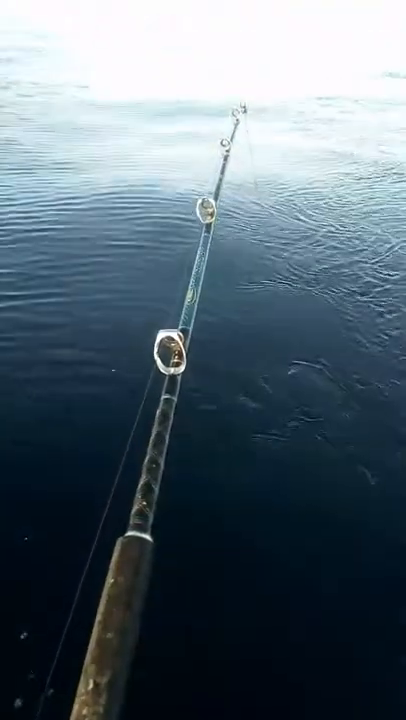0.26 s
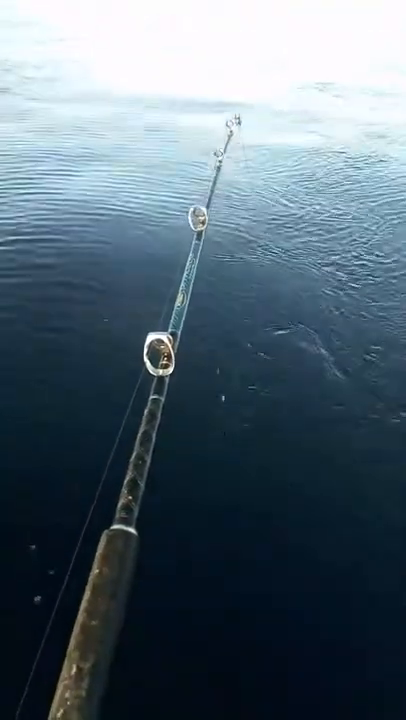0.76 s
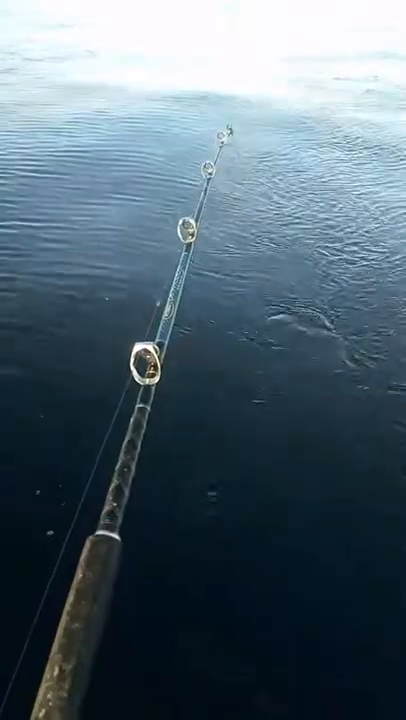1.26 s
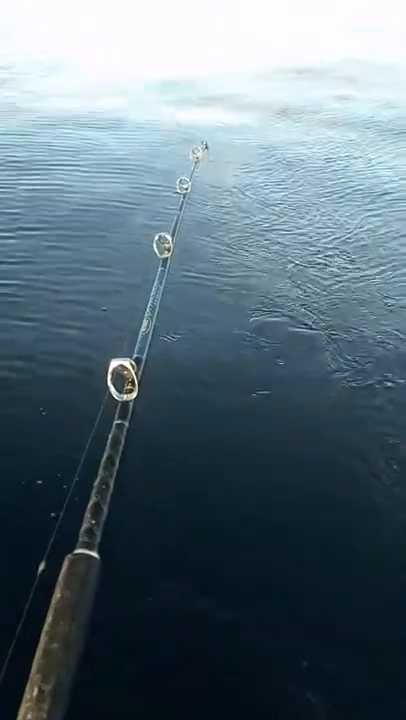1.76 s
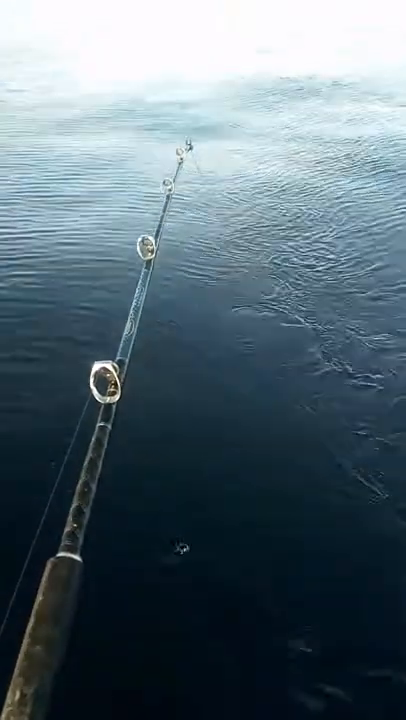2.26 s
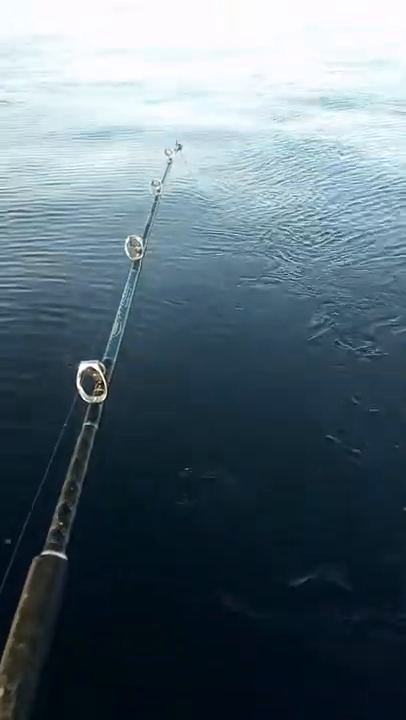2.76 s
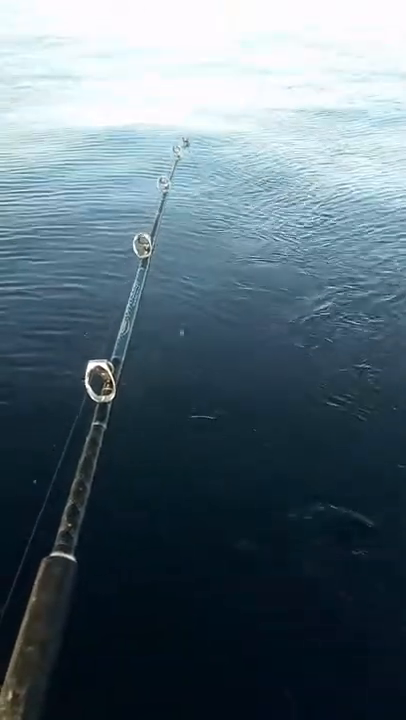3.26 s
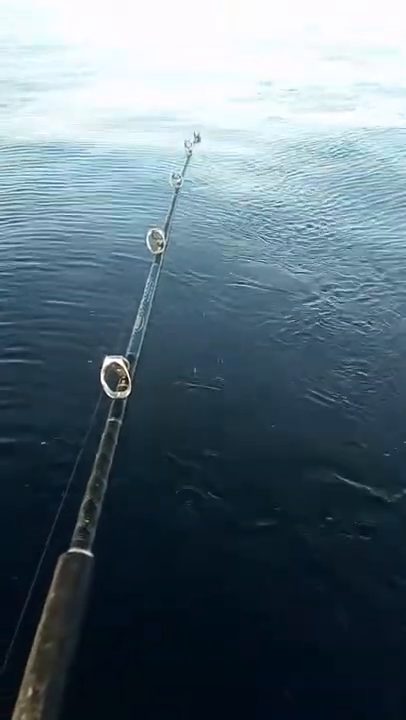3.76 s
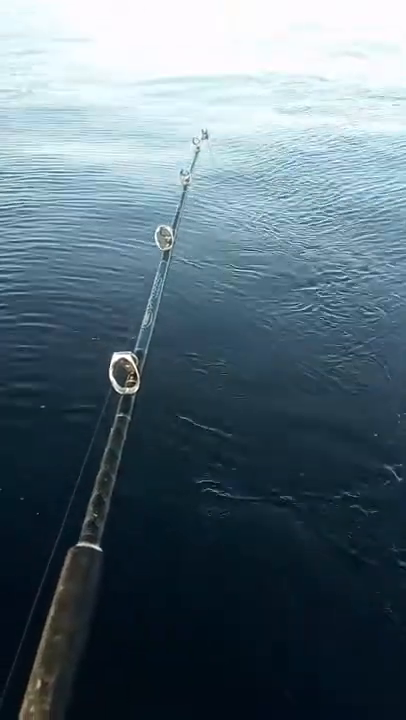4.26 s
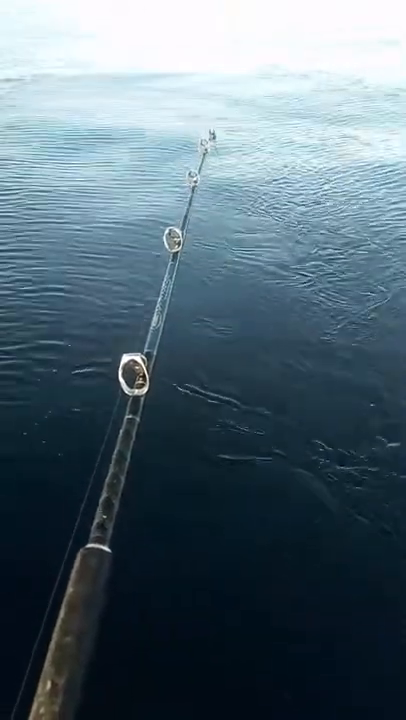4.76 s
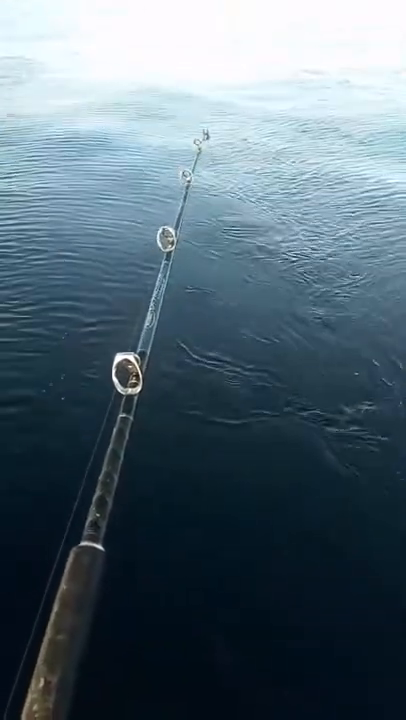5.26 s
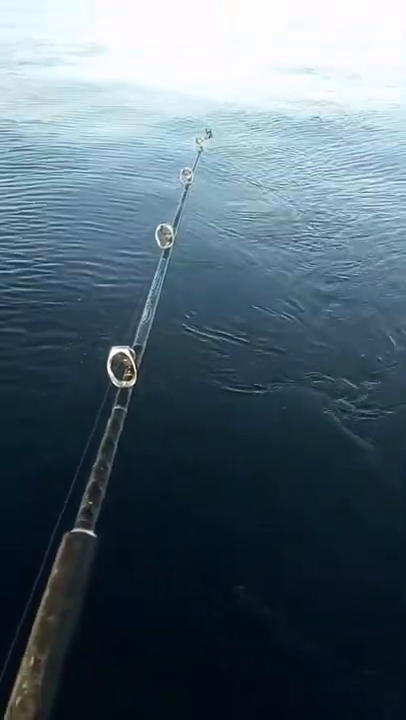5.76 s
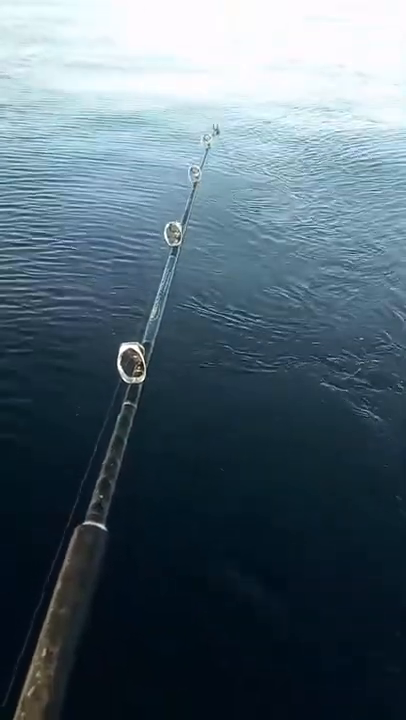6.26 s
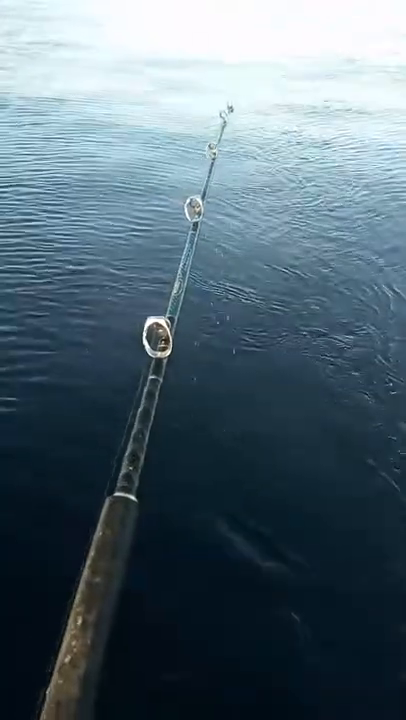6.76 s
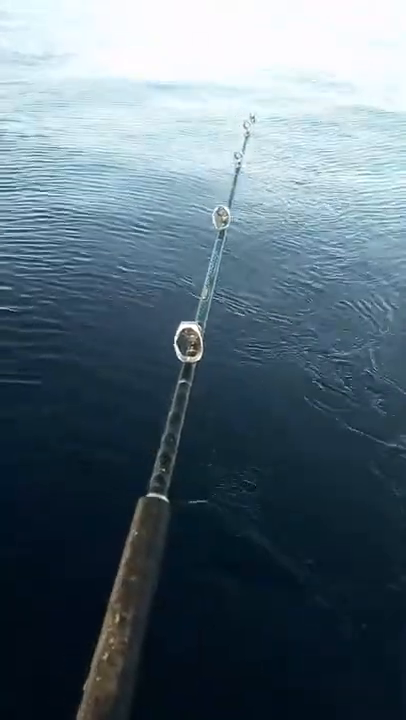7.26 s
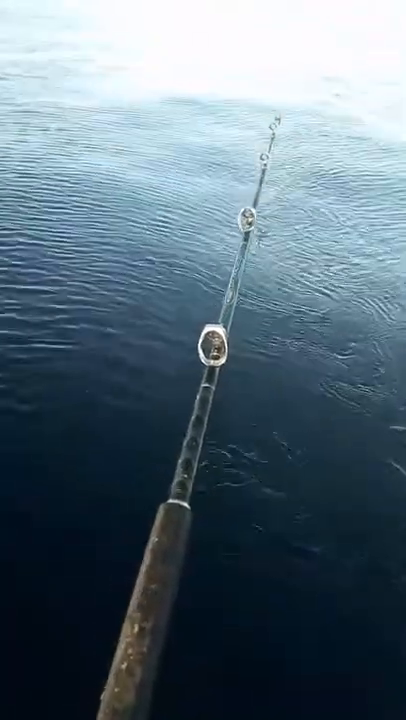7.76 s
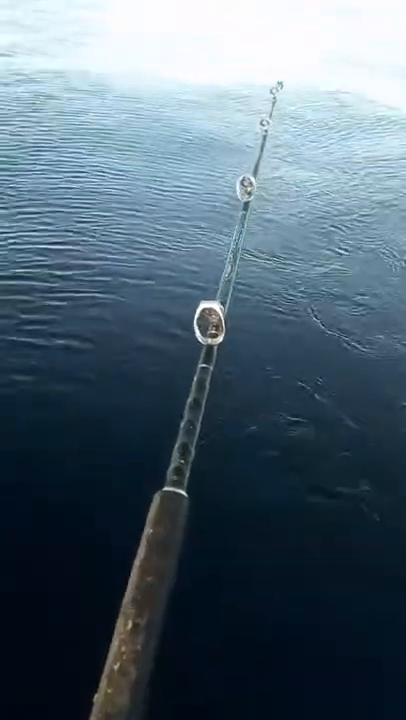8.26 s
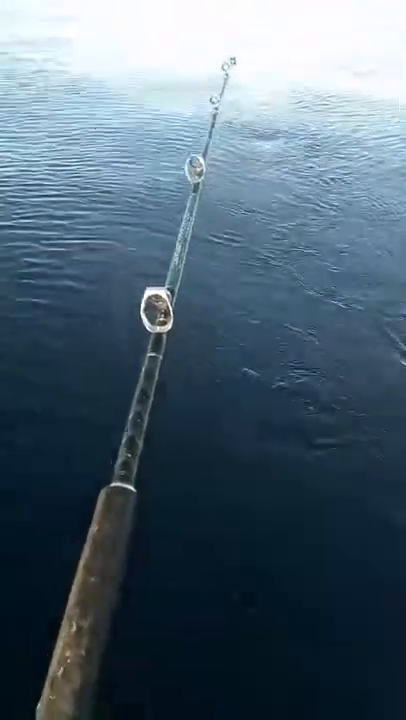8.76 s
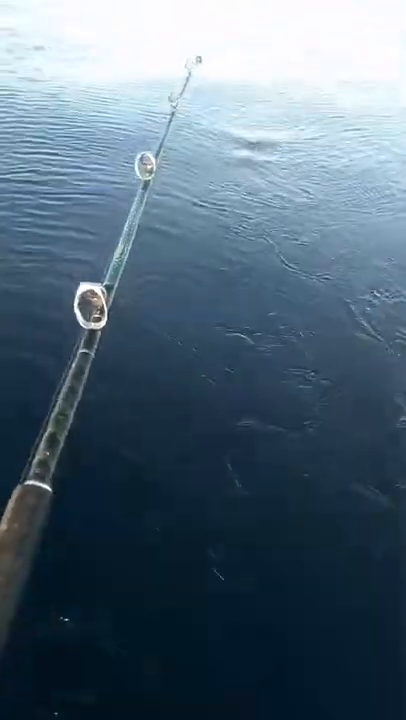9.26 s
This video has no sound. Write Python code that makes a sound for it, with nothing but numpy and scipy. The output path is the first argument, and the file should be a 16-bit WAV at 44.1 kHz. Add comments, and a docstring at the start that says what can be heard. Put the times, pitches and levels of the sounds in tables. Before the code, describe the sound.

A small electric fishing reel whines steadily up close, throbbing several times a second with raspy gears, then its pitch slides down as it slows.

```python
"""Electric fishing reel

An electric fishing reel winds line up from deep water, close to the microphone on a boat, and slows near the end.
Tones locked to the motor make its hum, the whine of its ten-tooth pinion and the song of a second gear stage.
Filtered noise and shaft lines make the gears rasp in the housing; every spool turn swishes and loads the motor.
Bursts of low noise are wind on the microphone ports; short damped noises are knocks on the boat and rod.
"""
import sys
import numpy as np
from scipy import signal
from scipy.fft import rfft, irfft, next_fast_len
from scipy.io import wavfile

SR = 44100
rng = np.random.default_rng(int(sys.argv[2]) if len(sys.argv) > 2 else 0)


def pcm_store(signal):
    """Save signal as 16-bit PCM."""
    levels = np.round(np.clip(np.atleast_2d(signal), -1, 1) * 32767)
    wavfile.write(sys.argv[1], SR, levels.astype(np.int16).T)


N = 419832
TIME = np.arange(N) / SR
SIZE = next_fast_len(N + 4096, True)
BINS_HZ = np.maximum(np.arange(SIZE // 2 + 1) * SR / SIZE, 1)
CRUISE_SPEED = 150  # motor turns per second


def from_db(db):
    """Decibels to gain."""
    return 10 ** (np.asarray(db) / 20)


def rms_one(x):
    """Scale to unit power."""
    return x / np.sqrt(np.mean(x ** 2) + 1e-20)


def in_time(rows):
    """Each column of a curve at every sample."""
    s, *columns = np.transpose(rows)
    return [np.interp(TIME, s, c) for c in columns]


def in_hz(rows):
    """Each column of a spectrum at every frequency bin, joined along log frequency."""
    hz, *columns = np.transpose(rows)
    return [np.interp(np.log(BINS_HZ), np.log(hz), c) for c in columns]


def colour(x, gain):
    """Filter by a gain per frequency bin."""
    return irfft(rfft(x, SIZE) * gain, SIZE)[..., :N]


def white():
    """White noise of 0 dB per Hz."""
    return rng.standard_normal(N) * np.sqrt(SR / 2)


def white_pair():
    """Two independent white noises."""
    return np.array([white(), white()])


def drift(rate):
    """Smooth random curve of spread 1 that changes about rate times a second."""
    step = 40  # samples between the points of the curve
    pole = np.exp(-2 * step * np.pi * rate / SR)
    raw = rng.standard_normal(N // step + 2002)
    slow = signal.lfilter([1], [1, -2 * pole, pole * pole], raw)[2000:]  # drop the filter's start
    return np.interp(np.arange(N) / step, np.arange(len(slow)), rms_one(slow))


def swell(turns, depth_db, peak_at):
    """A gain of unit power that peaks once a turn, at the given share of the turn."""
    return rms_one(from_db(depth_db * np.cos(2 * np.pi * (turns - peak_at))))


def burst(start, level_db, decay, rise):
    """Envelope that jumps up and dies away."""
    age = np.maximum(TIME - start, 0)
    attack = 1 - np.exp(-age / rise)
    return from_db(level_db) * attack * np.exp(-np.minimum(age / decay, 20))


GUST_RISE_SHARE = 0.74  # rise length against fall length


def gust(peak, length):
    """Envelope that swells quickly and ebbs more slowly."""
    age = (TIME - peak) / length
    age = np.where(age < 0, age / GUST_RISE_SHARE, age)
    return np.exp(-np.minimum(age ** 2, 20))


def response(points, hz):
    """Gain of a radiating body for a gliding tone."""
    points_hz, db = np.transpose(points)
    return from_db(np.interp(np.log(hz), np.log(points_hz), db))


def follow(law, speed, load_db):
    """Gain of a source that follows the load and a power of the speed."""
    level_db, per_load, power = law
    return from_db(level_db + per_load * load_db) * (speed / CRUISE_SPEED) ** power


def partial(turns, multiple, rough, rough_hz):
    """A line locked to the shaft; uneven tooth contact shakes its strength and phase."""
    angle = 2 * np.pi * multiple * turns
    in_step = (1 + rough * drift(rough_hz)) * np.cos(angle)
    out_of_step = rough * drift(rough_hz) * np.sin(angle)
    return rms_one(in_step + out_of_step)


# The reel as the two microphone ports pick it up.
# Each row: frequency in Hz, left over right in dB, lead of the left in radians, likeness of the ports from 0 to 1.
PORT_PICKUP = [(100, -0.5, 0.14, 1), (437, 0.5, 1.06, 0.86), (726, 3, 1.64, 1), (1660, 3, 2.44, 1),
               (2003, 4, 3.55, 0.93), (3240, 0, 5.25, 0.22), (3360, -5.5, 4.55, 0.88),
               (4450, 12, 4.6, 0.14), (4340, 8, 4.8, 0.42), (5020, 7.5, 3.59, 0.11), (7070, 6, 4.44, 0.99),
               (6830, 4.5, 5.48, 0.33), (9250, 0.5, 5.15, 0.25)]


def at_ports(direct, scattered, gain):
    """Direct sound reaches the left port first; scattered sound differs between the ports."""
    balance_db, lead, alike = in_hz(PORT_PICKUP)
    alike = np.clip(alike, 0, 1)
    spectrum = rfft(direct, SIZE)
    if scattered is not None:
        mid, side = rfft(scattered, SIZE)
        shared = np.sqrt((1 + alike) / 2) * mid
        opposed = np.sqrt((1 - alike) / 2) * side * [[1], [-1]]
        spectrum = spectrum + shared + opposed
    ratio = from_db(balance_db)
    ports = np.array([ratio, np.exp(-1j * lead)]) * np.sqrt(2 / (1 + ratio ** 2))
    return irfft(spectrum * ports * gain, SIZE)[:, :N]


def air():
    """Faint steady hiss, independent at each port."""
    return from_db(-104) * white_pair()  # dB per Hz


# Gusts and short buffets on the ports.
# Each row: peak in seconds, left level in dB, right level in dB, length in seconds.
WIND_GUSTS = [(0.532, -53, -62, 0.16), (1.953, -42, -66, 0.088), (2.062, -26, -48, 0.0065),
              (2.11, -33, -54, 0.023), (2.234, -54, -52, 0.016), (2.303, -40.5, -55, 0.077),
              (2.537, -63, -45, 0.02), (2.748, -53, -57, 0.08), (2.89, -67, -40, 0.025),
              (2.958, -65, -35, 0.019), (2.997, -73, -38.5, 0.024), (3.195, -68, -49, 0.04),
              (3.313, -68, -47, 0.04), (3.416, -48, -25.5, 0.011), (4.434, -58, -74, 0.062),
              (5.609, -65, -40, 0.018), (5.766, -62, -25.5, 0.012), (5.84, -59, -27, 0.042),
              (5.907, -56, -19.5, 0.016), (6.11, -59, -39.5, 0.085), (6.216, -66, -31.5, 0.038),
              (6.31, -28.5, -30, 0.03), (6.494, -48, -38, 0.068), (6.584, -59, -32, 0.04),
              (6.785, -41, -72, 0.025), (7.025, -45.5, -68, 0.18), (7.094, -36, -64, 0.014),
              (8.19, -63, -56, 0.15), (8.46, -58, -36, 0.05), (8.58, -67, -52.5, 0.27)]
# Colour of the buffeting. Each row: frequency in Hz, relative level in dB.
WIND_COLOUR = [(20, -20), (55, 8.5), (115, 10.5), (190, -0.5), (270, -13.5), (420, -21), (900, -42),
               (3000, -86)]
BREEZE_DB = -68


def wind(lumpy_db=-1.5):
    """Lumpy low buffeting over a faint breeze, each port with its own eddies."""
    strength = from_db(BREEZE_DB)
    for peak, left_db, right_db, length in WIND_GUSTS:
        strength = strength + from_db([[left_db], [right_db]]) * gust(peak, length)
    eddies = []
    for _ in range(2):
        lumps = rms_one(from_db(lumpy_db * drift(31)))
        rumble = rms_one(colour(white(), from_db(in_hz(WIND_COLOUR)[0])))
        eddies.append(lumps * rumble)
    return strength * np.array(eddies)


def thuds(events, spectrum, rise, apart):
    """Short, heavily damped blows, slightly different at the two ports."""
    blows = sum(burst(start, db, decay, rise) for start, db, decay in events)
    shake = white() + apart * white() * [[1], [-1]]
    return blows * rms_one(colour(shake, from_db(in_hz(spectrum)[0])))


# Knocks on the boat. Each row: start in seconds, level in dB, decay in seconds.
BOAT_KNOCKS = [(6.401, -18.5, 0.0083), (6.41, -25, 0.035), (6.467, -42, 0.043), (6.523, -38, 0.031),
               (6.59, -41, 0.022), (8.461, -40, 0.076)]
# Colour of a knock. Each row: frequency in Hz, relative level in dB.
KNOCK_COLOUR = [(70, -15), (200, 7.5), (330, 6.5), (600, 4.5), (1000, -6), (1800, -9.5), (2600, 2.5),
                (3600, -12), (4400, -4), (6000, -15), (12000, -32)]
# Soft bumps of the hand on the rod. Each row: start in seconds, level in dB, decay in seconds.
ROD_BUMPS = [(.11, -35, 0.057), (1.085, -30.5, 0.046), (1.17, -52, 0.036), (1.245, -36.5, 0.031)]
# Colour of a bump. Each row: frequency in Hz, relative level in dB.
BUMP_COLOUR = [(30, -26), (80, -4), (130, -3), (185, 4), (260, -5), (380, -18), (900, -64)]


def knocks():
    """Something clatters on the boat, and the hand bumps the rod: sharp and soft noise blows."""
    clatter = thuds(BOAT_KNOCKS, KNOCK_COLOUR, rise=0.0005, apart=0.65)
    return clatter + thuds(ROD_BUMPS, BUMP_COLOUR, rise=0.0025, apart=0.2)


GEAR_RATIO = 25.86  # motor turns per spool turn
WOBBLE_SPEED = 1.05  # motor turns per second, before the line steadies it
WOBBLE_STEADYING = 0.84  # dB per dB of load


def steadied(load_db):
    """Share of the spool's wobble that is left as the line grows taut."""
    return from_db(-WOBBLE_STEADYING * np.maximum(load_db, -4))


def shaft(speed, load_db, jitter_turns=0.0059, jitter_hz=14):
    """Turns of motor and spool; the spool's uneven load pulls on the motor once a turn."""
    wobble = WOBBLE_SPEED * steadied(load_db)
    spool = np.cumsum(speed) / SR / GEAR_RATIO
    motor = np.cumsum(speed + wobble * np.cos(2 * np.pi * (spool - .58))) / SR
    return motor + jitter_turns * drift(jitter_hz), spool


# How hard the line rubs on the spool. Each row: time in seconds, relative level in dB.
LINE_RUB = [(0, 4.5), (.6, 4), (1.92, -2.5), (3.21, 5.5), (4.2, 1), (5.17, 4.5), (6.1, 0.5), (7.53, 2),
            (7.9, -21), (9.52, -27)]
# Colour of the rubbing, with the spool's resonance. Each row: frequency in Hz, relative level in dB.
SWISH_COLOUR = [(300, -110), (480, -75), (620, -95), (700, -73), (755, -63.5), (830, -75), (920, -82),
                (1100, -100.5), (1600, -120)]
# Low lines that shake the spool. Each entry: multiple of the motor speed.
SHAKE_ORDERS = [6, 7]
# Strength of those lines. Each entry: level in dB before the swish colour.
SHAKE_DB = [18.5, 13]


def swish(motor, spool):
    """The spool rubs once a turn, and low motor lines ring out as they slide through its resonance."""
    rub = from_db(in_time(LINE_RUB)[0]) * swell(spool, depth_db=6.5, peak_at=0.069)
    shake = sum(from_db(db) * partial(motor, order, rough=1.0, rough_hz=30)
                for order, db in zip(SHAKE_ORDERS, SHAKE_DB))
    return at_ports(shake, rub * white_pair(), from_db(in_hz(SWISH_COLOUR)[0]))


def comb(motor, count=80, size=2048, spread_db=2.5):
    """Uneven teeth jolt alike on every turn: multiples of the speed, slowly blending two patterns."""
    jolts, blend = 0, drift(2.66)
    for share in (np.cos(blend), np.sin(blend)):
        phases = np.exp(2j * np.pi * rng.random(count))
        strengths = from_db(spread_db * rng.standard_normal(count)) * phases
        one_turn = rms_one(irfft(np.r_[0, strengths], size)) * np.sqrt(count)
        jolts = jolts + share * np.interp(motor % 1, np.arange(size) / size, one_turn)
    return jolts


RATTLE_HZ, RATTLE_WIDTH_HZ = 3234, 810
RATTLE_ORDER = 30  # multiple of the motor speed that drives the rattle
RATTLE_DB, RATTLE_CAPTURE_HZ = -36.5, 212  # level before the port balance
SING_DB, SING_HZ, SING_RANGE_HZ = -32, 3092, 100  # level before the port balance


def rattle(motor, speed, loose=0.81):
    """A rough buzz and a whistle in one housing resonance, as a mesh overtone sweeps through it."""
    band = 1 / (1 + (2 * (BINS_HZ - RATTLE_HZ) / RATTLE_WIDTH_HZ) ** 2) ** 2
    buzz = rms_one(colour(rms_one(comb(motor)), band))
    buzz = buzz + loose * rms_one(colour(white(), band))
    drive_hz = RATTLE_ORDER * speed
    caught = 1 / (1 + ((drive_hz - RATTLE_HZ) / RATTLE_CAPTURE_HZ) ** 8)
    # the whistle answers over a narrower range than the buzz
    tuned = 1 / (1 + ((drive_hz - SING_HZ) / SING_RANGE_HZ) ** 4)
    whistle = from_db(SING_DB) * tuned * partial(motor, RATTLE_ORDER, rough=0.52, rough_hz=35)
    return (from_db(RATTLE_DB) * caught * rms_one(buzz) + whistle) * from_db([[2], [-4]])


# Bursts of grinding teeth. Each row: peak in seconds, level in dB before the port gain, length in seconds.
GRINDS = [(7.044, -28.5, 0.062), (7.205, -28.5, 0.049), (7.36, -41, 0.03)]
CHATTER_HZ, CHATTER_WIDTH_HZ = 4300, 910


def chatter(motor):
    """Under the heaviest pull the teeth grind in short bursts, a buzz with a little noise in it."""
    band = 1 / (1 + (2 * (BINS_HZ - CHATTER_HZ) / CHATTER_WIDTH_HZ) ** 4)
    buzz = rms_one(colour(comb(motor), band))
    grind = rms_one(buzz + 0.71 * rms_one(colour(white(), band)))
    envelope = sum(from_db(db) * gust(peak, length) for peak, db, length in GRINDS)
    return at_ports(grind * envelope, None, 0.94)


# Shaft lines that sing out during the run-down. Each entry: multiple of the motor speed.
RUN_DOWN_ORDERS = [16.8, 16.8, 26, 33, 33, 33, 40, 43, 50, 60]
# The resonance each one passes. Each row: resonance in Hz, reach in Hz, level in dB before the port gain.
RUN_DOWN_RESONANCES = [(2440, 40, -34.5), (2184, 35, -37), (3690, 120, -36), (4600, 140, -40.5),
                       (4240, 92, -42), (3450, 99, -50), (5320, 81, -40), (5130, 78, -34), (5850, 150, -39),
                       (6450, 190, -42.5)]


def run_down(motor, speed):
    """As the motor slows, weak shaft lines slide through narrow resonances and sing out."""
    tones = 0
    for order, (hz, reach_hz, db) in zip(RUN_DOWN_ORDERS, RUN_DOWN_RESONANCES):
        tuned = np.exp(-np.minimum(((order * speed - hz) / reach_hz) ** 2, 20))
        tones = tones + from_db(db) * tuned * partial(motor, order, rough=0.41, rough_hz=29)
    return at_ports(tones, None, 0.85)


# Lines from uneven teeth. Each entry: multiple of the motor speed.
TOOTH_ORDERS = [6, 9, 11, 14, 16.3, 16.8, 18, 21, 22, 24, 33, 34, 42, 43, 44, 46, 47, 48]
# Strength of those lines. Each entry: level in dB over one Hz of rasp.
TOOTH_DB = [19.5, 26, 21.5, -4, 17.5, 24.5, 25, -2, 17, 20, 23.5, 26.5, 18, 15.5, 17, 14.5, 15, 9]
# High whistling shaft lines. Each entry: multiple of the motor speed.
HIGH_ORDERS = [58, 60, 70, 80]
# Strength of the whistles. Each entry: relative level in dB.
HIGH_DB = [26, 30.3, 32.6, 34.7]
# How well the whistles carry at each pitch. Each row: frequency in Hz, gain in dB.
HIGH_CARRY = [(6100, -25), (6500, -3), (6900, 5.5), (7300, -0.5), (7800, -2)]
# Ride of whistles and jolts through the take-up. Each row: time in seconds, relative level in dB.
HIGH_RIDE = [(0, 6), (1.2, -2), (7.4, -8), (7.8, -11), (8.4, 3), (8.9, -1.5), (9.3, 2.5), (9.52, -0.5)]
COMB_DB, COMB_LOWEST_HZ = 16, 1980  # jolts against the whistles, and where their low end rolls off


def shaft_lines(motor, speed, top_hz=7900):
    """The weaker lines locked to the shaft; the housing passes little of them above its top resonance."""
    lines = sum(from_db(db) * partial(motor, order, rough=1.0, rough_hz=24.0)
                for order, db in zip(TOOTH_ORDERS, TOOTH_DB))
    whistles = 0
    for order, db in zip(HIGH_ORDERS, HIGH_DB):
        carried = from_db(db) * response(HIGH_CARRY, order * speed)
        whistles = whistles + carried * partial(motor, order, rough=0.23, rough_hz=25)
    jolts = colour(comb(motor), 1 / (1 + (COMB_LOWEST_HZ / BINS_HZ) ** 2))
    lines += from_db(in_time(HIGH_RIDE)[0]) * (whistles + from_db(COMB_DB) * jolts)
    return colour(lines, 1 / (1 + (BINS_HZ / top_hz) ** 20))


# Colour the housing gives the rasp. Each row: frequency in Hz, relative level in dB.
HOUSING_COLOUR = [(100, -94.5), (330, -85), (600, -80.5), (1200, -80.5), (1800, -78.5), (2200, -74.5),
                  (2450, -74), (2700, -79), (2900, -72), (3300, -73), (3900, -77.5), (4400, -73),
                  (5250, -74), (5550, -69.5), (5800, -72.5), (6500, -67), (6900, -67), (7350, -71),
                  (7600, -73), (8100, -86), (8600, -94.5), (10300, -91.5), (13500, -102), (15300, -96)]
# Housing resonances on top of it. Each row: centre in Hz, width in Hz, boost in dB.
HOUSING_RESONANCES = [(523, 97, 12.5), (1607, 250, 5), (3120, 220, 4), (3603, 440, 7), (4760, 270, -2),
                      (5024, 215, 6)]
# Ride of the gear rasp. Each row: time in seconds, relative level in dB.
RASP_RIDE = [(0, -1), (.3, 2), (1.0, -1), (1.3, -2.5), (4.5, 0), (6.5, -0.5), (7.05, 2), (7.6, 6), (7.8, 0),
             (8.5, -1), (8.95, -2.5), (9.52, -8)]
# Ride of the bearing hiss. Each row: time in seconds, relative level in dB.
HISS_RIDE = [(0, 2.5), (.25, 3), (.75, 3), (1.2, 1.5), (5.2, 2), (6.8, 1.5), (7.53, 1.5), (7.85, 1.5),
             (8.35, -2.5), (9, 2.5), (9.52, -8.5)]
SLIDING_POWER = 0.42  # power of the speed: tooth noise fades faster than the lines as the motor slows


def rasp(motor, spool, speed, low_hz=2200, split_hz=4800):
    """Sliding teeth and bearings shake the housing with noise and shaft lines."""
    contact = swell(motor, depth_db=1.0, peak_at=0.12) * rms_one(from_db(2.03 * drift(23)))
    contact = contact * (speed / CRUISE_SPEED) ** SLIDING_POWER
    housing_db = in_hz(HOUSING_COLOUR)[0]
    for hz, width, db in HOUSING_RESONANCES:
        housing_db = housing_db + db / (1 + (2 * (BINS_HZ - hz) / width) ** 2)
    sound = at_ports(shaft_lines(motor, speed), contact * white_pair(), from_db(housing_db))
    # the gears fill the middle of the range, the bearings the top
    above_low, above_split = (1 / (1 + (hz / BINS_HZ) ** 10) for hz in (low_hz, split_hz))
    gears = colour(sound, above_low - above_split)
    bearings = colour(sound, above_split)
    body = (sound - gears - bearings) * speed / speed.max()
    hiss = from_db(in_time(HISS_RIDE)[0]) * bearings * swell(spool, depth_db=1.12, peak_at=0.95)
    return body + from_db(in_time(RASP_RIDE)[0]) * gears + hiss


# How well the motor casing radiates the hum at each pitch. Each row: frequency in Hz, gain in dB.
CASING_GAIN = [(256, -30), (282, 0), (335, -2), (378, -5), (408, 3), (435, 6), (455, -0.5)]
HUM_DB, HUM_DAMPING = -42, 0.15  # level before casing and ports, and dB lost per dB of load


def hum(motor, speed, load_db):
    """Three rotor poles hum through the casing, rougher as the motor slows."""
    poles = 3
    level = from_db(HUM_DB - HUM_DAMPING * load_db) * response(CASING_GAIN, poles * speed)
    return level * partial(motor, poles, rough=0.28 * (CRUISE_SPEED / speed) ** 2, rough_hz=27)


# Ride of the pinion's fundamental. Each row: time in seconds, level in dB before the port gain.
PINION_RIDE = [(0, -35), (.57, -26.5), (.92, -34.5), (1.3, -31.5), (5.5, -32), (6.05, -29.5), (6.55, -29.5),
               (6.68, -38), (7.35, -34.5), (7.68, -40), (8.4, -46), (9, -60), (9.52, -75)]


def pinion(motor):
    """Ten pinion teeth meet the gear on every motor turn and sing one steady fundamental."""
    return from_db(in_time(PINION_RIDE)[0]) * partial(motor, 10, rough=0.26, rough_hz=44.3)


# Overtones of the ten-tooth mesh, and side lines the rotor poles set between them.
# Each entry: multiple of the motor speed.
OVERTONE_ORDERS = [20, 23, 27, 30, 40, 50]
# Throb period of each overtone. Each entry: length in spool turns.
OVERTONE_THROB_TURNS = [1, 1, 1, 1, 2, 1]
# How each overtone behaves. Each row: relative cruising level in dB, dB per dB of load, power of the speed,
# throb in dB, throb peak as a share of its period, roughness from 0 to 1 at cruise, roughness rate in Hz.
OVERTONES = [(-41, 1.91, 0.5, 7, 0.48, 0.25, 27), (-44, 2.5, 17, 3, 0.57, 0.67, 29),
             (-41.5, 0, 1.5, 3, 0.79, 0.86, 42), (-33.5, 0.88, 2.5, 4, 0.99, 0.67, 75),
             (-45, 1.64, -5, 1.5, 0.058, 0.27, 54), (-47, 0.5, 7.5, 3, 0.02, 0.3, 21)]
# How well the gearbox radiates a tone; overtones flare and fade as they slide through it.
# Each row: frequency in Hz, gain in dB.
GEARBOX_GAIN = [(1700, 20.5), (1818, 24.5), (1916, 7), (2003, 18.5), (2055, 8.5), (2095, 14), (2128, 10),
                (2178, 15.5), (2215, 20.5), (2259, 4.5), (2285, 9), (2335, 1.5), (2408, -14), (2480, 3.5),
                (2580, 13), (2623, 10.5), (2663, 11.5), (2700, 5.5), (2765, 9.5), (2796, 2.5), (2868, 2),
                (3050, 0.5), (3500, -4), (3980, -9), (4550, -9.5), (4800, -20), (5300, -2), (5800, -15),
                (5980, 3.5), (6150, 10), (6500, 21), (6700, 12), (7150, 12.5), (7400, 5), (7600, 6.5)]
# Spool turns on which the first overtone flares or falls short.
# Each row: peak in seconds, change in dB, length in seconds.
OVERTONE_FLARES = [(1.256, 4.5, 0.046), (1.9, 11, 0.049), (2.504, 3, 0.031), (2.839, 9.5, 0.027),
                   (3.163, 2.5, .04), (4.06, 5, 0.036), (4.384, 2, .04), (4.706, 3.5, .04),
                   (5.033, -6, 0.064), (5.566, 5.5, 0.077), (5.904, 3.5, 0.035), (6.274, 6, 0.047),
                   (6.592, 5, 0.037), (6.768, 6, 0.037), (6.943, 4, 0.034), (7.45, -3, 0.04)]
# Ride of the side line near 4.1 kHz at cruise. Each row: time in seconds, relative level in dB.
SIDE_RIDE = [(0, -4), (.7, 3), (.87, 12), (1.02, 13), (1.1, 2), (6.6, 4), (6.95, 17.5), (7.4, 21),
             (7.8, 13.5), (8.4, 12), (8.9, 3), (9.52, -11)]
# Ride of the overtone near 4.5 kHz at cruise. Each row: time in seconds, relative level in dB.
MIDDLE_RIDE = [(0, -10), (.46, 1), (1.15, -2), (1.55, 5), (2.45, 5.5), (2.6, 1), (3.3, 1), (3.95, 8.5),
               (4.35, 1), (6.4, 5), (7.03, 1.5), (7.23, 3), (7.55, -1), (8.3, -5), (8.55, 4), (9.52, 6)]
# Ride of the bright overtone near 6 kHz at cruise. Each row: time in seconds, relative level in dB.
BRIGHT_RIDE = [(0, 10.5), (.3, 3), (.75, 5), (1.04, 5), (1.12, 2), (2.1, -4), (3.0, -3), (4.5, 5.5),
               (5.3, 4), (6.3, 0.5), (6.85, -2), (7.02, -0.5), (7.3, -1), (9.52, -16)]
# Ride of the overtone near 7.5 kHz at cruise. Each row: time in seconds, relative level in dB.
TOP_RIDE = [(0, 5), (.2, -8), (.7, -8), (.95, 3), (3, 1), (6.3, -2.5), (6.8, -16.5), (7.3, 1.5), (9.52, 1)]


def mesh_overtones(motor, spool, speed, load_db):
    """Mesh overtones throb with the spool and colour themselves in the gearbox."""
    # throb and roughness die away as the motor slows
    cruising = (speed / CRUISE_SPEED) ** 3
    throb = np.minimum(cruising, 1) ** 4 * steadied(load_db)
    flare_db = sum(db * gust(peak, length) for peak, db, length in OVERTONE_FLARES)
    rides_db = [flare_db, 0]
    rides_db += [in_time(ride)[0] for ride in (SIDE_RIDE, MIDDLE_RIDE, BRIGHT_RIDE, TOP_RIDE)]
    tone = 0
    for order, turns, row, ride_db in zip(OVERTONE_ORDERS, OVERTONE_THROB_TURNS, OVERTONES, rides_db):
        *law, throb_db, peak_at, rough, rough_hz = row
        level = follow(law, speed, load_db) * response(GEARBOX_GAIN, order * speed) * from_db(ride_db)
        throbbing = swell(spool / turns, throb_db * throb, peak_at)
        tone = tone + level * throbbing * partial(motor, order, rough * cruising, rough_hz)
    return tone


# Lines of the second gear stage; the upper one beats against the pinion's first overtone.
# Each entry: multiple of the motor speed.
SECOND_ORDERS = [13.59, 20.38]
# How each line behaves. Each row: cruising level in dB before the port gain, dB per dB of load,
# power of the speed, throb in dB, throb peak in spool turns, roughness from 0 to 1.
SECOND_LINES = [(-49.5, 1.5, 1.8, 9.5, 0.28, 1), (-43, 0.5, 7.6, 1.5, 0.61, 0.96)]


def second_stage(motor, spool, speed, load_db):
    """The second gear stage sings rough lines that throb once a spool turn."""
    tone = 0
    for order, (*law, throb_db, peak_at, rough) in zip(SECOND_ORDERS, SECOND_LINES):
        throbbing = swell(spool, throb_db * steadied(load_db), peak_at)
        line = partial(motor, order, rough, rough_hz=33.7)
        tone = tone + follow(law, speed, load_db) * throbbing * line
    return tone


def whine(motor, spool, speed, load_db):
    """Rotor hum, pinion, mesh overtones and second stage reach the ports as direct sound."""
    tone = hum(motor, speed, load_db) + pinion(motor)
    tone = tone + mesh_overtones(motor, spool, speed, load_db)
    tone = tone + second_stage(motor, spool, speed, load_db)
    return at_ports(tone, None, 0.66)


# Motor speed without the spool's wobble. Each row: time in seconds, speed in turns per second.
MOTOR_SPEED = [(0.0, 149.6), (0.28, 153.4), (0.43, 152.0), (0.56, 154.0), (0.74, 151.5), (1.0, 150.7),
               (1.2, 148.5), (1.45, 149.6), (2.08, 148.2), (2.6, 151.0), (2.9, 151.7), (3.6, 150.4),
               (3.92, 149.7), (4.1, 150.9), (4.8, 150.7), (5.55, 151.3), (5.8, 149.7), (6.4, 149.8),
               (6.6, 150.4), (6.85, 148.9), (7.02, 151.2), (7.3, 151.6), (7.57, 151.1), (7.7, 145.2),
               (7.88, 140.8), (8.08, 137.8), (8.3, 130.4), (8.52, 121.3), (9.02, 108.5), (9.28, 99.0),
               (9.4, 93.7), (9.52, 86.0)]
# Pull of the line on the gears. Each row: time in seconds, load in dB against its cruising value.
LINE_LOAD = [(0, -0.5), (.08, 2.5), (.25, 6), (.6, 5), (1.02, 3.5), (1.1, 2), (2.0, 2), (2.7, 4),
             (3.3, 1.5), (3.8, 1.9), (4.5, 3.5), (4.9, 1.5), (5.3, 3), (6, 1), (6.55, 1.8), (7.05, 7),
             (7.64, 7.5), (7.78, 7), (8.9, 3), (9.52, -4)]


def scene():
    """The reel in open air, played by its speed and load, with wind, knocks and a faint hiss."""
    speed, = in_time(MOTOR_SPEED)
    load_db, = in_time(LINE_LOAD)
    motor, spool = shaft(speed, load_db)
    background = air() + wind() + knocks()
    reel = swish(motor, spool) + rattle(motor, speed) + chatter(motor) + run_down(motor, speed)
    reel = reel + rasp(motor, spool, speed) + whine(motor, spool, speed, load_db)
    return background + reel


def record(dry):
    """A steep elliptic low-pass cuts the top."""
    low_pass = signal.ellip(10, .1, 80, 15550, fs=SR, output="sos")  # order, ripple dB, stop dB, cutoff Hz
    return signal.sosfilt(low_pass, dry)


dry = scene()
out = record(dry)
pcm_store(out)
```